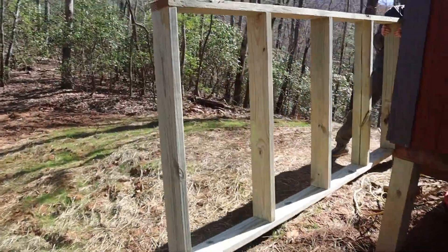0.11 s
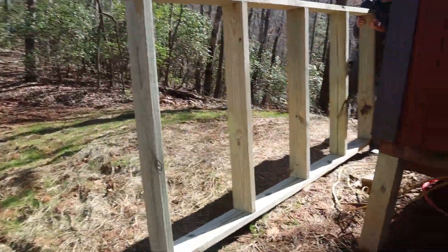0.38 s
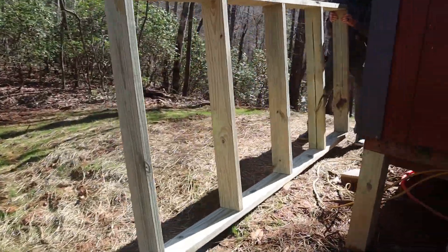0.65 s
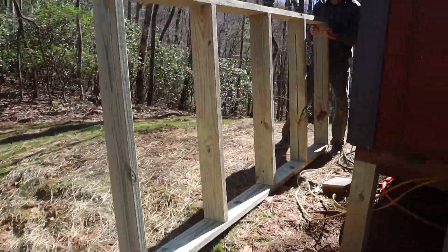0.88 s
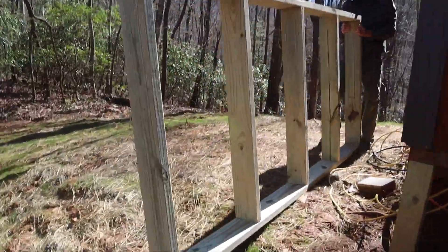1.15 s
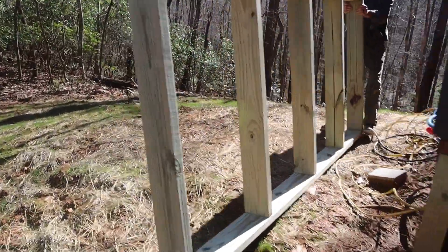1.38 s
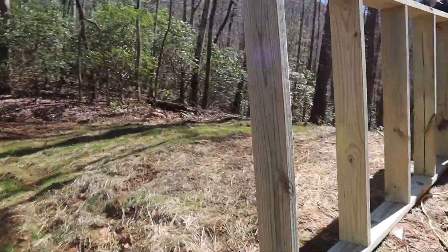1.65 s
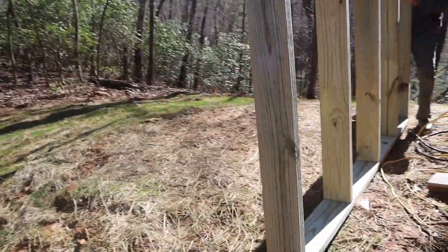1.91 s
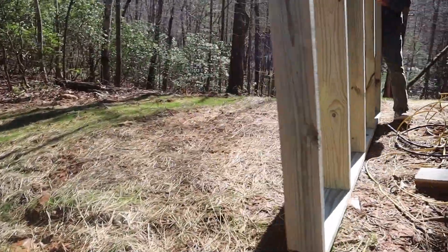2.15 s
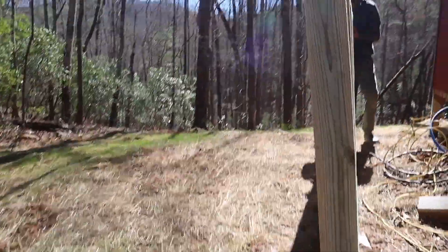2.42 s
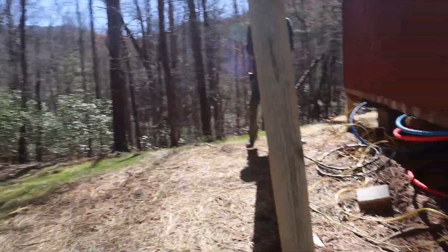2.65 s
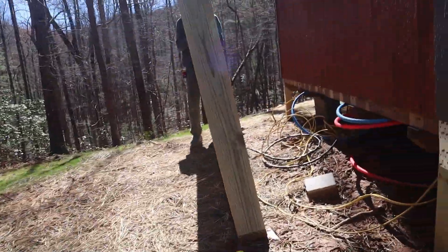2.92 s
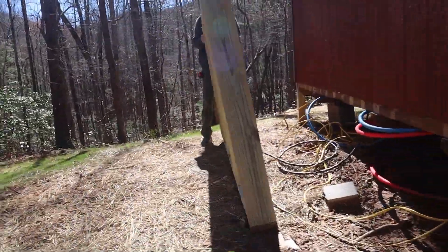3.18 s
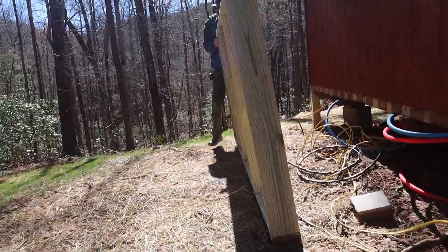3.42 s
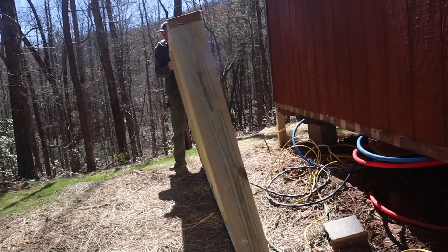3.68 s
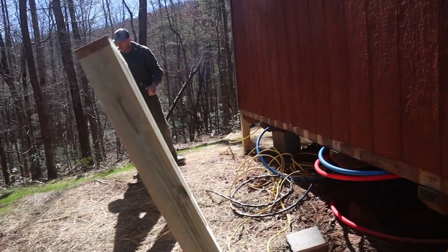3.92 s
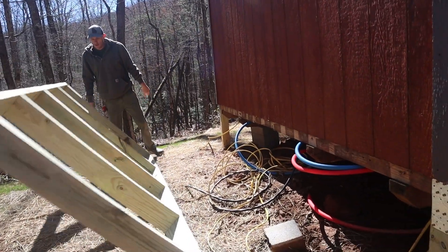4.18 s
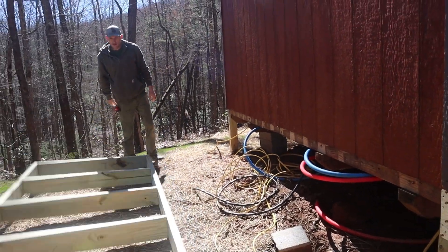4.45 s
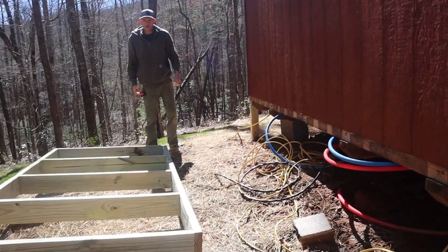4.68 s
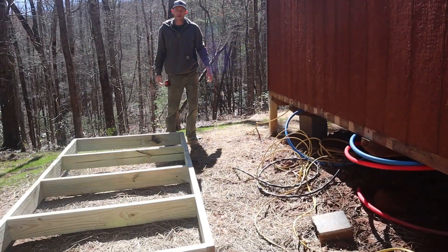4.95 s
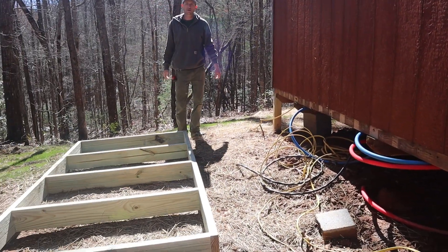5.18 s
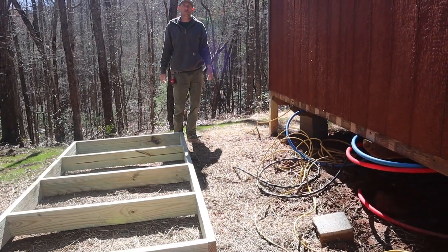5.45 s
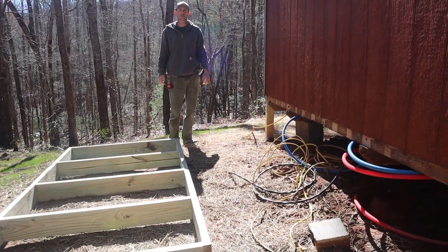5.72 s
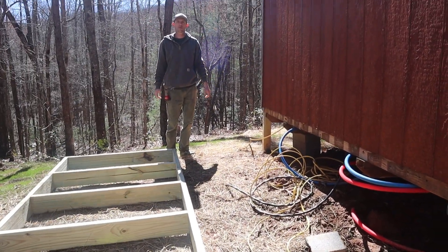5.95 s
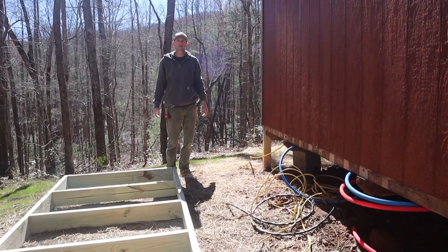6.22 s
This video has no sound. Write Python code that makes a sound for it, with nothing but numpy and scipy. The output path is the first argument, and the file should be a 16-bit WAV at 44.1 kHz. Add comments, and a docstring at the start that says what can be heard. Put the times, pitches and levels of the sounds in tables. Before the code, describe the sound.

A large timber frame scrapes and rustles through dry straw with small wooden knocks, then slams flat on the ground with a loud bouncing clatter.

```python
"""A timber wall frame drags upright through dry straw, knocks now and then and falls flat with a bounce:
random slips and snaps are filtered for scrape, rustle and rubs; blows excite decaying wood modes.
Thumps and short pops are damped sines, the hand-held camera ticks through its housing modes,
the woods hush and rumble as filtered noise, and a far-off bird sings gliding sines.
Two close ports pick it up with a widened side signal."""
import sys
import numpy as np
from scipy import signal
from scipy.fft import rfft, irfft
from scipy.io import wavfile

SR = 44100
rng = np.random.default_rng(int(sys.argv[2]) if len(sys.argv) > 2 else 0)


def int16_out(signal):
    """Quantize to a 16-bit WAV file."""
    q = np.round(np.clip(np.atleast_2d(signal).T, -1, 1) * 32767)
    wavfile.write(sys.argv[1], SR, q.astype(np.int16))


def attenuation_scalar(level_db):
    """Turn a level in dB into a linear amplitude multiplier (20 dB per decade)."""
    decades = np.asarray(level_db, float) / 20
    return 10 ** decades


N = 279594   # samples

# bending modes of the timber frame: (frequency [Hz], relative level [dB], t60 before scaling [s])
FRAME = [(164.64, 3, 0.086), (212.3, -2.5, 0.5), (288.4, 2, 0.074), (330.3, 0, 0.094), (385.3, 5, 0.066),
         (463, -3, 0.08), (538.5, -1, 0.29), (664, -1.5, 0.17), (745, 4, 0.07), (831.5, -2.5, 0.11),
         (900, 3.5, 0.073), (983.5, 7.5, 0.054), (1100, -3, 0.16), (1218, 5, 0.03), (1330, 0, 0.1),
         (1431, 3, 0.026), (1556, -3.5, 0.14), (1880, 11.5, 0.015), (1923, 9.5, 0.0094), (2063, 2, 0.063),
         (2224.5, 12.5, 0.034), (2656, 9, 0.03), (2976, 5.5, 0.036), (3260, -16, 0.02), (3449, 5, 0.022),
         (4170, 0, 0.016), (5050, 0, 0.012), (6000, -7, 0.01)]
# where the frame sounds from as the camera turns: (time [s], lean [-1 left to 1 right])
BEARING = [(0, 0.51), (.6, 0.52), (1.2, 0.41), (1.5, 0.7), (2.1, 0.73), (2.7, 0.74), (2.9, 0.36),
           (3.6, 0.4), (4.15, 0.31), (4.5, -0.61), (5.2, -0.51), (6.34, -0.61)]
# blows on the frame: (time [s], peak of the ringing [dB], centre of the struck modes [Hz],
# breadth [octaves], level of the crack before its 2 dB trim [dB], stretch of the ring [ratio])
KNOCKS = [(0.212, -36, 557, 0.88, -38, 0.7), (0.298, -35.5, 642, 0.76, -51, 0.65),
          (0.313, -33.5, 588, 1.03, -58, 0.5), (0.522, -32, 690, 1.4, -58, 0.8),
          (0.535, -29.5, 360, 1.05, -51, 0.44), (0.582, -20.5, 519.7, 0.59, -49, 0.28),
          (1.031, -27.5, 480.4, 1.16, -56, 0.45), (1.1215, -19.5, 3300, 1.21, -25.5, 0.46),
          (1.1246, -14.5, 787, 0.81, -52, 0.54), (1.146, -34, 620, 0.76, -62, .6),
          (1.233, -24, 1400, 0.37, -68, 0.23), (1.238, -26.5, 640, 0.52, -70, 0.35),
          (1.253, -35, 607, 0.86, -64, 0.05), (1.443, -30, 576, 0.99, -61, .55),
          (1.473, -26.5, 688, 1.5, -57, 0.63), (1.847, -29.5, 763, 0.97, -41, .55),
          (1.914, -27, 650, 1, -59, 0.4), (1.978, -36, 980, 0.89, -40, 0.52),
          (2.91, -18, 724, 0.36, -25, 0.44), (2.941, -37, 400, 0.39, -52, 0.74),
          (2.944, -25.5, 801, 0.37, -53, 0.5), (3.423, -26, 450, 1.1, -31.5, 0.67),
          (3.622, -26, 1196, 1.07, -38, 0.27), (3.625, -20.5, 863, 0.84, -38.5, 0.51),
          (3.636, -24.5, 750, 0.81, -51, 0.52), (3.673, -34, 1500, 1.2, -46, .4),
          (4.105, -15, 898, 1.02, -36.5, 0.52), (4.115, -20, 1100, 1.03, -56, 0.62),
          (4.547, -12, 346, 1.23, -27, 0.63), (4.549, 3.5, 700, 8.1, -15.5, 0.56),
          (4.556, -11.5, 300.3, 1.44, -43, 1), (4.563, -23, 1500, 1.3, -36, 0.7),
          (4.568, -18, 380, 1.1, -41, .6), (4.582, -16.5, 280.4, 0.49, -60, .9),
          (4.592, -16, 627, 0.7, -54, 0.5), (4.604, -24, 425, 0.98, -61, 0.77),
          (4.619, -22, 240, 0.66, -62, .9), (4.644, -24, 267, 1.13, -41, 0.9),
          (4.659, -33, 1100, 1.7, -40, 0.7), (4.674, -26, 229.9, 1.2, -51, 0.81),
          (4.72, -21.5, 407, 4.9, -61, .8), (4.832, -32.5, 350.3, 0.94, -48, 0.72),
          (4.897, -17, 905, 0.94, -35, 0.63), (4.9, -11.5, 1400, 1.1, -40, 0.44),
          (4.906, -9.5, 420.3, 1.36, -32.5, 0.5), (4.917, -16.5, 403.7, 1.16, -55, 0.73),
          (4.931, -32, 500, 1.28, -55, .7), (4.955, -20.5, 249.7, 1.2, -43, 0.74),
          (4.957, -17, 2810, 1.8, -25.5, 0.44), (4.963, -16.5, 396, 1.89, -52, 0.66),
          (4.995, -30, 580, 1.19, -61, .8), (5.08, -36, 600, 1.3, -43, 0.47),
          (5.087, -20, 295, 0.72, -40, .3), (5.111, -33, 195, 0.69, -41.5, .6),
          (5.142, -28, 230, 1.13, -43, 0.48), (5.368, -45, 321, 0.92, -50, 0.74),
          (5.579, -34, 220, 1.48, -65, 0.57)]


def rms_one(x):
    """Normalise the mean power: scale to rms 1."""
    return x / np.sqrt(np.mean(x ** 2) + 1e-20)


def in_time(rows):
    """Linear interpolation in time: each column of a curve, sample by sample."""
    s, *columns = np.transpose(rows)
    return [np.interp(np.arange(N) / SR, s, column) for column in columns]


def at_hz(points, hz):
    """Interpolation of a spectrum on a log-frequency axis."""
    table_hz, table_db = np.transpose(points)
    return np.interp(np.log(hz + 1), np.log(table_hz), table_db)


def coloured(x, spectrum):
    """Linear filtering: multiply the Fourier transform by a magnitude response."""
    gain_db = at_hz(spectrum, np.fft.rfftfreq(N, 1 / SR))
    return irfft(rfft(x) * attenuation_scalar(gain_db), N)


def drift(rate):
    """Low-pass random fluctuation of rms 1: noise through two equal poles at rate [Hz]."""
    hop = 40   # one value every 40 samples
    r = np.exp(-2 * np.pi * rate * hop / SR)
    noise = rng.standard_normal(N // hop + 2002)
    slow = signal.lfilter([1], [1, -2 * r, r * r], noise)[2000:]   # drop the settling
    return np.interp(np.arange(N) / hop, np.arange(len(slow)), rms_one(slow))


def ring(clicks, hz, t60):
    """Damped resonator: a unit click sets a sine of initial height 1 ringing."""
    r, w = attenuation_scalar(-60 / (t60 * SR)), 2 * np.pi * hz / SR
    return signal.lfilter([0, np.sin(w)], [1, -2 * r * np.cos(w), r * r], clicks + 1e-18)


def placed(pair, lean, scatter_db):
    """Sound field in three rows: pressure, its directional part, and a diffuse part from the second row."""
    return np.array([pair[0], lean * pair[0], attenuation_scalar(scatter_db) * pair[1]])


def grains(per_s, spread_db, clump_db, clump_rate):
    """Random impulse process: two streams of tiny uneven snaps that share their clumps."""
    spread = np.minimum(rng.exponential(1, (2, N)), 5)
    sizes = attenuation_scalar(spread_db * spread) * rng.standard_normal((2, N))
    happens = rng.random((2, N)) < per_s / SR
    return sizes * happens * attenuation_scalar(clump_db * drift(clump_rate))


def drag():
    """Stick-slip friction: the bottom plate's chatter drives the frame's modes; stalks snap and brush."""
    # the frame moving over the ground: (time [s], plate scraping [dB], stalks rustling [dB])
    motion = [(0.0, -48, -44), (0.32, -45, -45), (0.37, -44, -50), (0.71, -45.5, -49.5),
              (1.25, -55.5, -61.5), (1.42, -49.5, -57.5), (1.5, -41.5, -46), (1.64, -46, -44.5),
              (1.77, -40.5, -39), (1.95, -42, -41.5), (2.14, -41.5, -42.5), (2.4, -43.5, -42.5),
              (2.6, -44.5, -44.5), (2.83, -45, -40.5), (3.0, -44, -44.5), (3.16, -48.5, -45.5),
              (3.3, -46.5, -46.5), (3.39, -51.5, -56), (3.57, -48, -61), (3.75, -54.5, -59),
              (4.03, -49.5, -60.5), (4.2, -53, -62.5), (4.45, -55.5, -61), (4.55, -52, -39.5),
              (4.59, -42, -45), (4.64, -39, -45.5), (4.71, -42.5, -51.5), (4.8, -46, -52), (4.88, -48, -58),
              (4.925, -44, -40), (4.98, -42.5, -53), (5.05, -44.5, -56.5), (5.49, -57.5, -65),
              (5.81, -60.5, -67), (6.0, -56.5, -62), (6.34, -65, -64)]
    # spectrum of the scraping: (frequency [Hz], relative level [dB])
    scrape_spectrum = [(90, -40), (150, -17), (300, -5), (500, 0), (950, 0), (1500, -5), (2500, -12),
                       (4000, -22), (8000, -60)]
    # spectrum of the stalks: (frequency [Hz], relative level [dB])
    straw_spectrum = [(710, -13.5), (1200, -5.5), (1810, -5), (2380, -3), (4050, -3.5), (4800, -6.5),
                      (7000, -13), (9100, -24), (15400, -120)]
    # spectrum of the fine blades: (frequency [Hz], relative level [dB])
    blade_spectrum = [(2500, -30), (4500, -8), (6500, -3), (9000, -4), (11500, -5), (12600, -11),
                      (14000, -40), (20000, -70)]
    wisp_stalks_db = 2.5   # what a wisp adds to the stalks' rustle, over its own level

    scrape_db, rustle_db = in_time(motion)
    slips = grains(7000, spread_db=1.0, clump_db=2.0, clump_rate=10.0)
    hum = sum(attenuation_scalar(db) * ring(slips, hz, t60 * 0.72) for hz, db, t60 in FRAME)
    scrape = rms_one(rms_one(coloured(slips, scrape_spectrum)) + attenuation_scalar(-7.5) * rms_one(hum))

    snaps = grains(14000, spread_db=0.4, clump_db=1.27, clump_rate=14.3)
    stalks = rms_one(coloured(snaps, straw_spectrum))
    # thick and thin stalks come in clumps of their own
    thick = signal.sosfilt(signal.butter(2, 2800, fs=SR, output="sos"), stalks)
    thin = stalks - thick
    rustle = rms_one(thick * attenuation_scalar(3.2 * drift(9.4)) + thin * attenuation_scalar(1.16 * drift(6.4) - 1.0))

    touches = grains(15000, spread_db=-0.5, clump_db=2.5, clump_rate=92)
    brush = rms_one(coloured(touches, blade_spectrum))
    lean = in_time(BEARING)[0]
    hiss = placed(brushing(rustle_db) * brush, lean, scatter_db=3)
    # the fine hiss is thinner in the mid the further it leans to one side
    hiss[0] *= attenuation_scalar(4.0 - 15.4 * lean ** 2)
    rustle_gain = attenuation_scalar(rustle_db) + attenuation_scalar(wisp_stalks_db) * wisps()
    return placed(attenuation_scalar(scrape_db) * scrape + rustle_gain * rustle, lean, scatter_db=-13.5) + hiss


def brushing(rustle_db):
    """Amplitude modulation of the finest hiss: it follows the rustle, blows and wisps."""
    brush_db, follows = -55, 0.9   # level when the rustle stands at -45.5 dB; share of its swing
    shaken_db, shaken_s = -54, 0.0073   # blades shaken by a blow: level over its crack; time constant
    blows = np.zeros(N)
    for s, *_, crack_db, stretch in KNOCKS:
        blows[round(s * SR)] = attenuation_scalar(crack_db + shaken_db)
    flares = signal.lfilter([1], [1, -np.exp(-1 / (shaken_s * SR))], blows + 1e-18)
    steady = attenuation_scalar(brush_db + follows * (rustle_db + 45.5) + 0.34 * drift(27.0))
    return steady + flares + wisps()


def surroundings():
    """Broadband ambient noise: the gently varying hush of the woods over a low rumble."""
    # spectrum of the woods: (frequency [Hz], relative level [dB])
    woods_spectrum = [(71, -58), (120, -23), (162, -0.5), (195, -11), (220, -9), (708, -15), (767, -17),
                      (1100, -23), (9360, -45), (14900, -36.5)]
    # low air: (time [s], level [dB])
    rumble_level = [(0.0, -50.5), (0.69, -51.5), (1.15, -49.5), (1.5, -54), (1.78, -50), (2.9, -48.5),
                    (3.3, -54.5), (3.53, -45.5), (3.92, -51.5), (4.59, -48), (5.01, -45.5), (5.32, -47.5),
                    (5.77, -51.5), (6.34, -50.5)]
    # spectrum of the rumble: (frequency [Hz], relative level [dB])
    rumble_spectrum = [(12, -52), (20, -16), (76, 11.5), (182, 1.5), (300, -1.5), (390, -3), (660, -120)]
    hush_gain = attenuation_scalar(-54.5 + 1.35 * drift(2.6))
    hush = hush_gain * rms_one(coloured(rng.standard_normal((2, N)), woods_spectrum))
    rumble_gain = attenuation_scalar(in_time(rumble_level)[0] + 0.88 * drift(2.6))
    rumble = rumble_gain * rms_one(coloured(rng.standard_normal((2, N)), rumble_spectrum))
    return placed(hush + rumble, 0, scatter_db=3.5)


def ticks():
    """Structure-borne impulses: housing modes, each of its own strength and sign, with a burst of grit."""
    # camera housing ticks: (time [s], level [dB], gain of the hollow part [dB], its centre [Hz])
    tick_rows = [(0.0521, -23, -2.5, 390), (0.5822, -20.5, -1.5, 530), (0.609, -33, -19, 320.8),
                 (0.6894, -39, 2, 791), (1.0303, -21.5, -4.5, 274), (1.4206, -34, 4, 312.8),
                 (1.4615, -30.5, 3, 621), (2.484, -20.5, -6.5, 401.7), (2.91, -13, -14, 996),
                 (2.9125, -11.5, -8, 726), (2.9408, -27.5, 6.5, 392), (2.981, -25, -2, 714),
                 (3.001, -17.5, -10.5, 520), (3.017, -32, -15, 732), (3.4245, -12, -9, 410),
                 (3.6742, -30, -7.5, 800), (3.684, -29.5, -4, 339), (3.6927, -30.5, 0, 291)]
    # housing modes: (frequency [Hz], relative level [dB], t60 [s], side over mid [dB])
    housing = [(339, 6.5, 0.11, -2), (572, 8, 0.011, 3), (756, 9, 0.067, 1), (1320, 15, 0.018, -4),
               (1860, 1.5, 0.014, -5), (2420, 7, 0.012, 3.5), (3610, -3.5, 0.026, 5), (4300, -9, 0.015, 0),
               (5640, 1.5, 0.012, 7), (7300, -7, 0.0018, 16), (10200, -37, 0.019, 14),
               (11400, -2, 0.0013, -12)]
    times, levels_db, hollows_db, centres_hz = np.transpose(tick_rows)
    at = (times * SR).astype(int)
    out = np.zeros((2, N))   # mid, side
    for hz, db, t60, side_db in housing:
        clicks = np.zeros((2, N))
        hollow_db = (hz < 1500) * (hollows_db - 5 * np.log2(hz / centres_hz) ** 2)
        chance = rng.standard_normal((len(at), 4))
        own = attenuation_scalar(2 * chance[:, :2].T) * np.sign(chance[:, 2:].T)
        clicks[:, at] = attenuation_scalar(levels_db + hollow_db + db - 16.5) * own
        out += ring(clicks, hz, t60) * attenuation_scalar([[0], [side_db]])
    grit = rng.standard_normal((len(at), 2, 220)) * np.exp(-np.arange(220) / 12.5)
    grit = signal.sosfilt(signal.butter(2, [1200, 11000], "band", fs=SR, output="sos"), grit)
    for start, db, burst in zip(at, levels_db, grit):
        out[:, start:start + burst.shape[1]] += attenuation_scalar(db - 1.0) * burst * attenuation_scalar([[0], [5]])
    return out


def knocks():
    """Modal impact: a rattle of contacts rings three detuned studs under a crack of dying noise."""
    first_touch = 2.4   # the first contact of a blow over the rattle after it
    out, t = np.zeros((3, N + SR)), np.arange(SR // 4) / SR
    edge = signal.butter(2, [1800, 11500], "band", fs=SR, output="sos")
    no_skirt = signal.butter(2, 130, "high", fs=SR, output="sos")
    for s, peak_db, centre_hz, breadth, crack_db, stretch in KNOCKS:
        stretch, body = max(stretch, 0.1), 0
        dying = np.exp(-t / (0.014 * stretch)) + 0.029 * np.exp(-t / (0.023 * stretch))
        rattle = rng.standard_normal((2, len(t))) * dying * (1 - np.exp(-t / 0.00062))
        rattle[:, :8] += first_touch
        for hz, db, t60 in FRAME:
            octaves = np.log2(hz / centre_hz)
            if abs(octaves) >= 2.5 * breadth:
                continue
            near_db = db - 6 * (octaves / breadth) ** 2
            # bending waves carry the treble fastest; a broad, flat slam strikes everywhere at once
            lag_s = 0.0028 * max(np.sqrt(2.4 * centre_hz / hz) - 1, 0) / max(breadth, 0.8) ** 2
            late = np.pad(rattle, ((0, 0), (int(lag_s * SR), 0)))[:, :len(t)]
            for apart in rng.uniform(-0.05, 0.05, 3):   # three studs a little apart in pitch
                body = body + attenuation_scalar(near_db) * ring(late, hz * (1 + apart), 1.026 * t60 * stretch)
        body = signal.sosfilt(no_skirt, body)   # high-pass removes the resonators' low skirt
        body = body / np.abs(body).max(axis=1, keepdims=True)
        tail = np.exp(-t / (0.0087 * stretch)) + 0.04 * np.exp(-t / (0.027 * stretch))
        snap = 0.88 * np.exp(-t / 0.0011)
        crack = signal.sosfilt(edge, rng.standard_normal((2, len(t)))) * (tail + snap)
        at, lean = round(s * SR), np.interp(s, *np.transpose(BEARING))
        out[:, at:at + len(t)] += placed(attenuation_scalar(peak_db) * body, lean, scatter_db=-18.0)
        out[:, at:at + len(t)] += placed(attenuation_scalar(crack_db - 2.0) * crack, lean, scatter_db=3.5)
    return out[:, :N]


def wisps():
    """Gaussian envelopes: the strength of single wisps, each swelling and fading about its centre."""
    # wisps of straw flicked or settling: (centre time [s], level [dB], width between 1/e points [s])
    wisp_rows = [(0.222, -54, 0.055), (0.296, -53, 0.055), (1.185, -62, 0.082), (1.316, -69, 0.033),
                 (3.987, -65.5, 0.094), (4.727, -57, 0.014), (4.87, -53.5, 0.016), (5.094, -59, 0.036),
                 (5.243, -58.5, 0.047), (5.31, -65, 0.019), (5.384, -60.5, 0.054), (5.448, -69, 0.016),
                 (5.682, -76, 0.01)]
    t = np.arange(N) / SR
    return sum(attenuation_scalar(db) * np.exp(-(2 * (t - s) / length) ** 2) for s, db, length in wisp_rows)


def rubs():
    """Friction-driven resonance: uneven slips ring two wood resonances that climb as the slide goes on."""
    # slides along a stud: (time [s], length [s], level [dB], first resonance [Hz],
    # second resonance [Hz], second over first [dB], width of the first one [Hz])
    slides = [(1.508, 0.071, -46, 1050, 2510, -14, 200), (1.745, 0.11, -39, 1036, 1597, -7.5, 222),
              (1.93, 0.086, -42, 1120, 664, -3, 161), (2.6, 0.36, -49, 740, 1100, -3.5, 90),
              (3.093, 0.038, -49, 743, 1760, 0, 80.6), (3.123, 0.069, -45, 746, 500, -4.5, 69.6),
              (3.469, 0.16, -53.5, 940, 1847, 2.5, 170), (3.672, 0.05, -48.5, 740, 2248, -3, 262)]
    rise = 0.0744   # share by which the resonances climb
    out, slips = np.zeros((2, N)), grains(3000, spread_db=2.0, clump_db=1.5, clump_rate=31.6)
    for s, length, db, first_hz, second_hz, second_db, width in slides:
        at, size = round(s * SR), round(length * SR)
        along, part = np.arange(size) / size, slips[:, at:at + size]
        tone = 0
        for hz, level_db in ((first_hz, 0), (second_hz, second_db)):
            half_width = width * hz / first_hz / 2
            a, b = signal.sosfilt(signal.butter(2, half_width, fs=SR, output="sos"), part)
            # shift the slow pair up to the gliding resonance
            turn = 2 * np.pi * np.cumsum(hz * (1 + rise * (along - 0.5))) / SR
            cos, sin = np.cos(turn), np.sin(turn)
            shifted = np.array([a * cos + b * sin, b * cos - a * sin])
            tone = tone + attenuation_scalar(level_db) * rms_one(shifted)
            part = part[:, ::-1]   # the second resonance takes the slips in reverse order
        out[:, at:at + size] += attenuation_scalar(db) * np.sqrt(np.sin(np.pi * along)) * tone
    return placed(out, in_time(BEARING)[0], scatter_db=-8)


def thumps():
    """Damped oscillation: each thump or pop is one dying sine, from deep ground thud to hollow wood knock."""
    # thumps and short pops: (time [s], level before onset and decay [dB], frequency [Hz], t60 [s])
    thump_rows = [(1.769, -24, 124.8, 0.08), (2.781, -31.5, 139, 0.073), (2.062, -38.5, 86, 0.31),
                  (2.341, -9, 434, 0.017), (2.769, -35, 59.7, 0.15), (3.43, -37, 86.1, 0.4),
                  (4.547, -29, 71.7, 0.49), (4.553, -7.5, 95, 0.068), (4.622, -27, 123.1, 0.12),
                  (4.72, -33, 43.4, 0.8), (4.904, -15, 62.9, 0.18), (4.906, -1, 299.8, 0.019),
                  (4.956, -21, 90.5, 0.16), (4.956, -9, 151, 0.034), (4.989, -23.5, 50.8, 0.32),
                  (5.091, -26, 88.3, 0.12), (5.145, -34, 58.7, 0.37), (5.576, -28, 81.6, 0.053)]
    out, t = np.zeros(N + SR), np.arange(SR) / SR
    for s, db, hz, t60 in thump_rows:
        at = round(s * SR)
        onset = 1 - np.exp(-t * hz / 0.34)
        out[at:at + SR] += attenuation_scalar(db - 60 * t / t60) * np.sin(2 * np.pi * hz * t) * onset
    return placed([out[:N], out[:N]], 0, scatter_db=-20)


def bird():
    """Frequency modulation and reverberation: swelling, gliding whistles and their scatter among trees."""
    # notes, each one arched glide: (time [s], length [s], first pitch [Hz], middle pitch [Hz],
    # last pitch [Hz], level before swell and flutter [dB])
    notes = [(2.791, 0.045, 8060, 7760, 7300, -60), (5.965, 0.065, 8500, 8050, 7100, -65),
             (6.09, 0.047, 5100, 5930, 5000, -57), (6.215, 0.032, 4050, 4170, 3980, -65)]
    song, t, flutter_db = np.zeros(N), np.arange(N) / SR, 2.6 * drift(60)
    for s, length, *pitches_hz, db in notes:
        along = np.clip((t - s) / length, 0, 1)
        hz = np.polyval(np.polyfit([0, 0.5, 1], pitches_hz, deg=2), along)
        edge = np.clip(np.minimum(along, 1 - along) * length / 0.0074, 0, 1)
        whistle = np.sqrt(2) * np.sin(2 * np.pi * np.cumsum(hz) / SR)
        song += attenuation_scalar(db + 3.5 * (along - 0.5) + flutter_db) * edge * whistle
    t = np.arange(SR // 2) / SR
    trees = rng.standard_normal((2, len(t))) * attenuation_scalar(-60 * t / 0.53 - 32.5)
    scattered = signal.fftconvolve(song[None], trees, axes=1)[:, :N]
    return placed(song + scattered, -0.39, scatter_db=4.5)


def scene():
    """Mid-side pickup: pressure is mid; quarter-cycle gradient, level difference and scatter form the side."""
    # scattered sound: (frequency [Hz], gain into the side [dB])
    width = [(60, -30), (120, -16), (240, -7.5), (470, -1.5), (930, 4), (1850, 8), (3660, 10.5), (7270, 1),
             (12000, 3), (14500, -1)]
    # pressure gradient of sound from one side: (frequency [Hz], gain into the side at lean 1 [dB])
    gradient = [(60, -42), (200, -59), (500, -28), (1000, -4.5), (2000, 1), (4000, 4.5), (8000, 7.5),
                (14000, 16)]
    # the nearer port hears a little more: (frequency [Hz], gain into the side at lean 1 [dB])
    shadow = [(100, -40), (250, -14), (500, -13), (1000, -24), (2000, -50)]
    mid, across, scatter = drag() + surroundings() + thumps() + knocks() + rubs() + bird()
    quarter_cycle_off = signal.hilbert(across).imag
    side = coloured(scatter, width) + coloured(quarter_cycle_off, gradient) - coloured(across, shadow)
    mid, side = np.array([mid, side]) + ticks()
    return np.array([mid + side, mid - side])


def roll_off(x):
    """The treble ends steeply here."""
    return signal.sosfilt(signal.butter(12, 15030, fs=SR, output="sos"), x)


def record(dry):
    """Amplitude saturation: peaks are clipped at full scale."""
    finished = np.clip(dry, -1, 1)
    return roll_off(finished)


dry = scene()
out = record(dry)
int16_out(out)
```